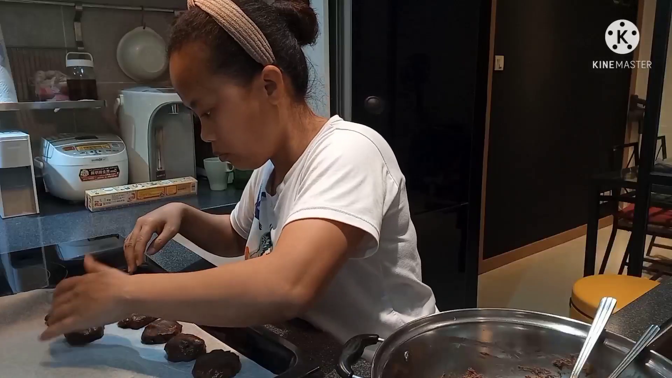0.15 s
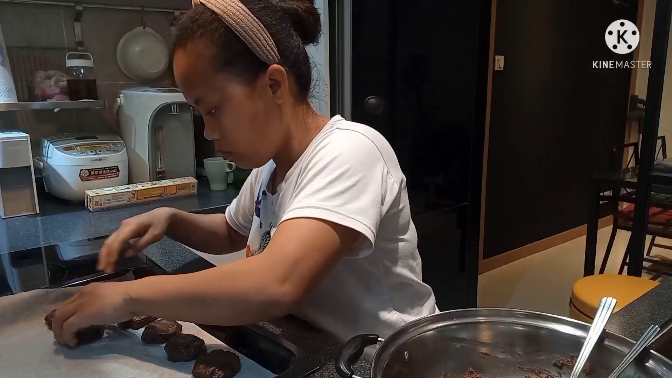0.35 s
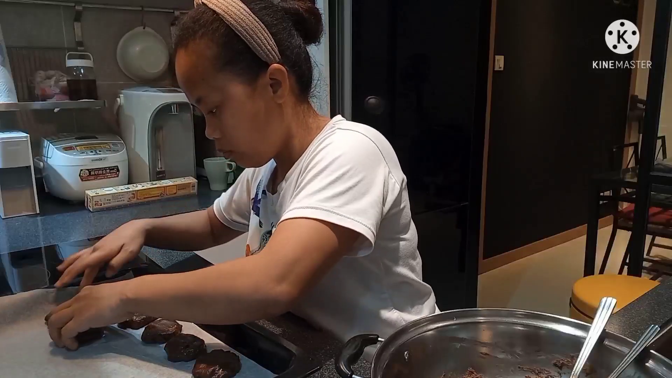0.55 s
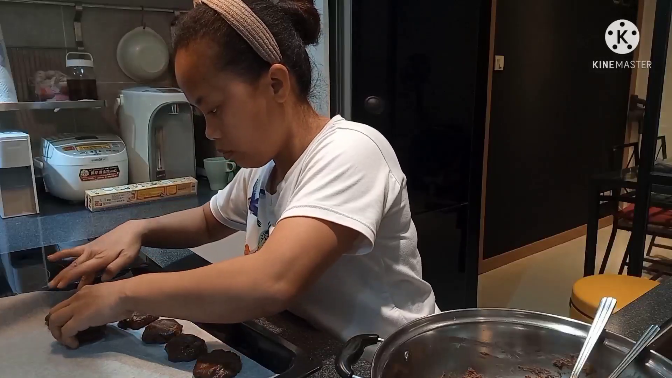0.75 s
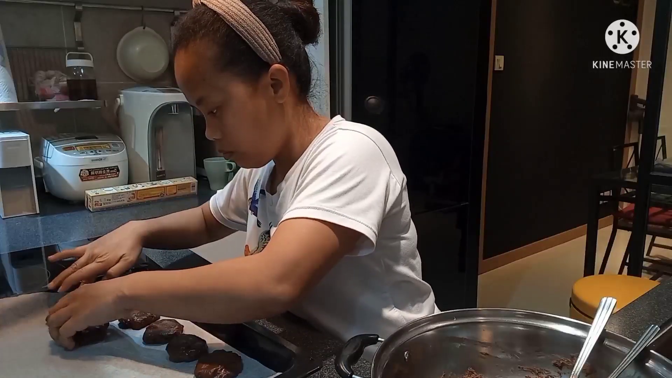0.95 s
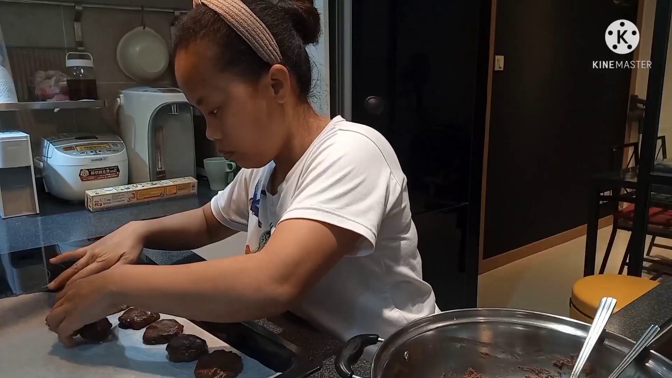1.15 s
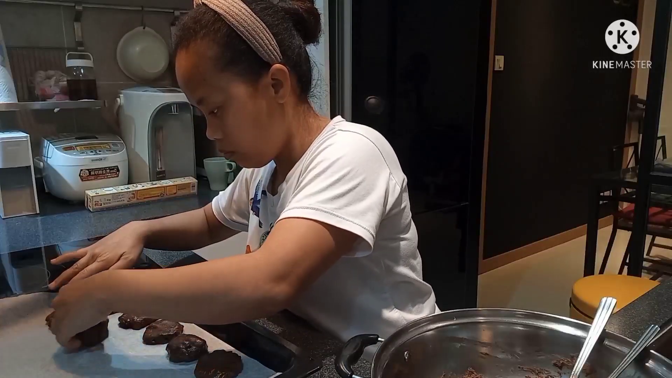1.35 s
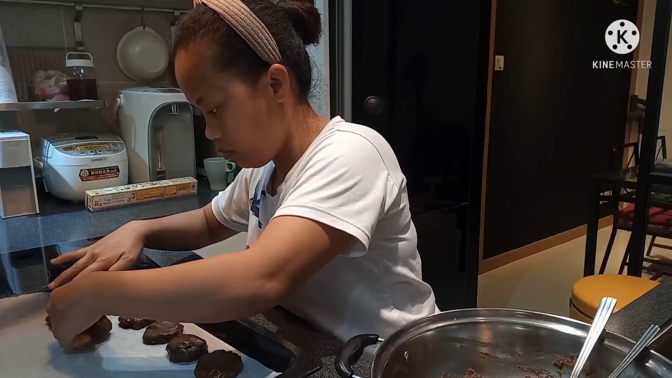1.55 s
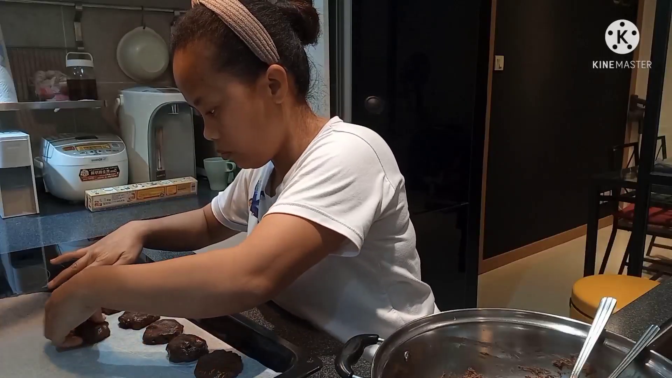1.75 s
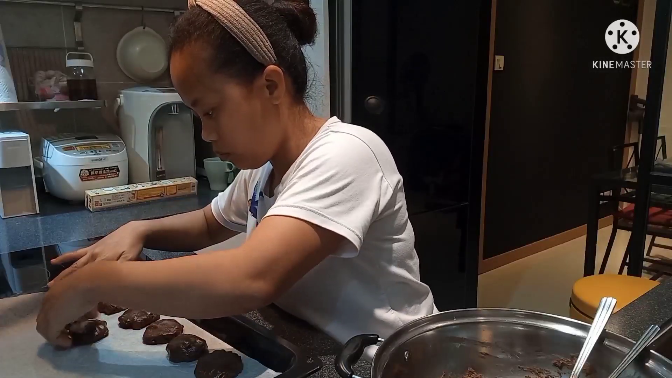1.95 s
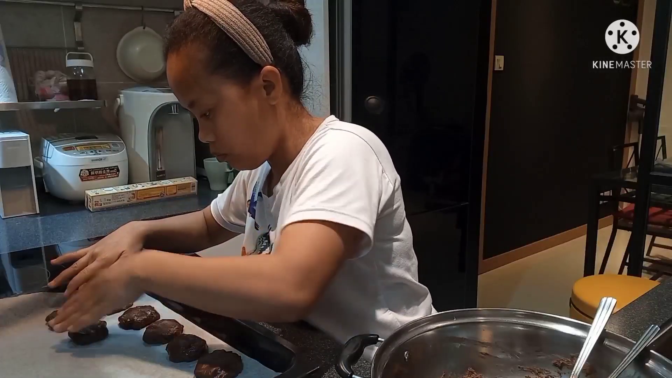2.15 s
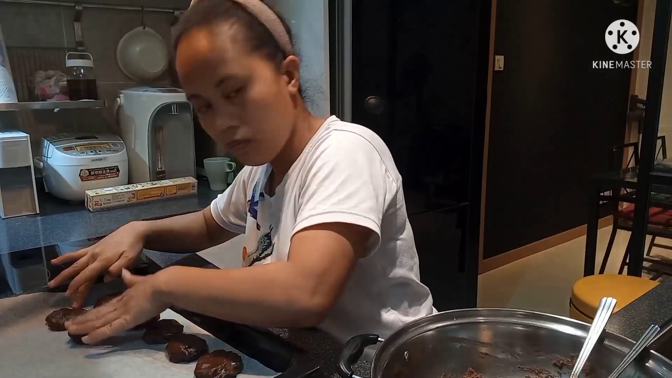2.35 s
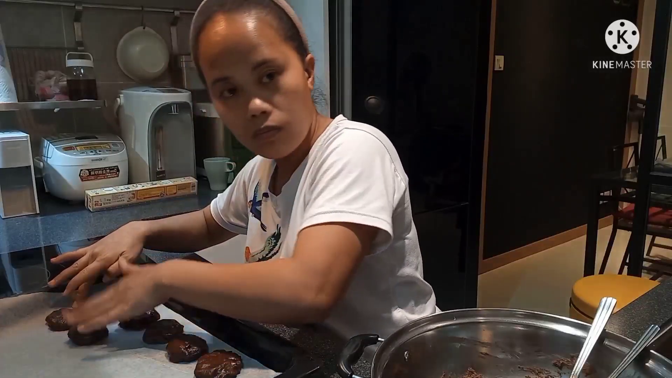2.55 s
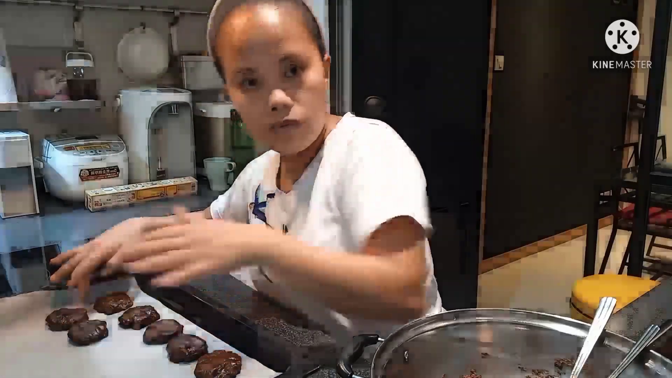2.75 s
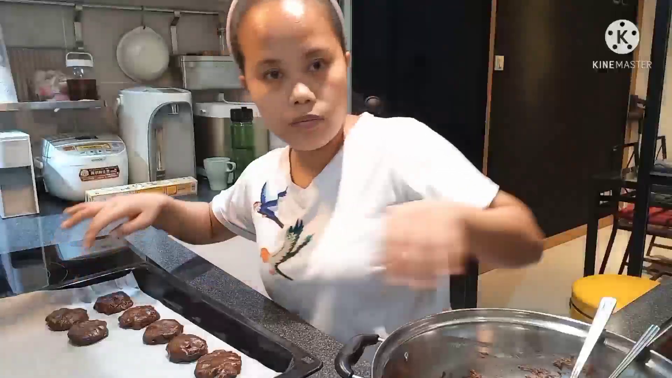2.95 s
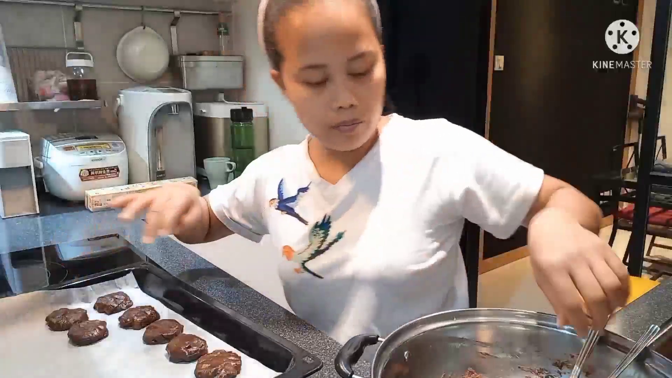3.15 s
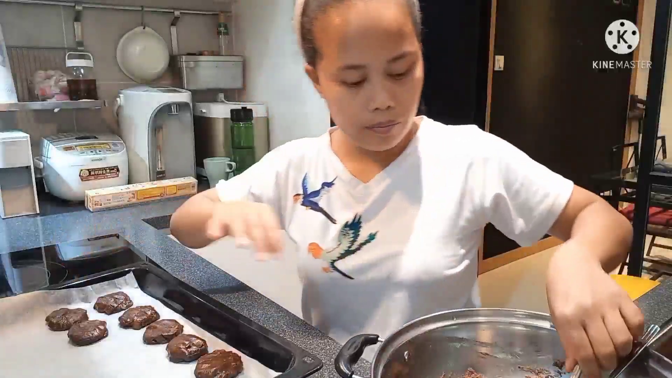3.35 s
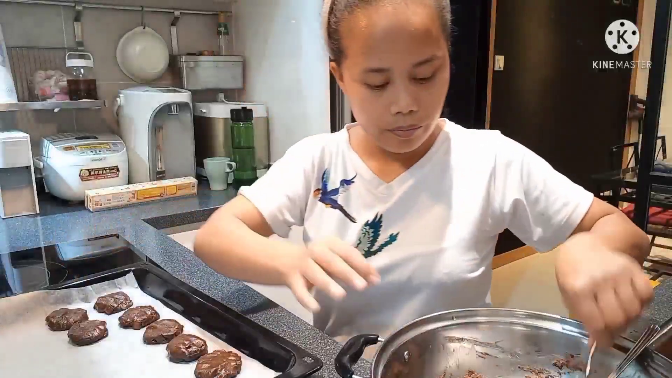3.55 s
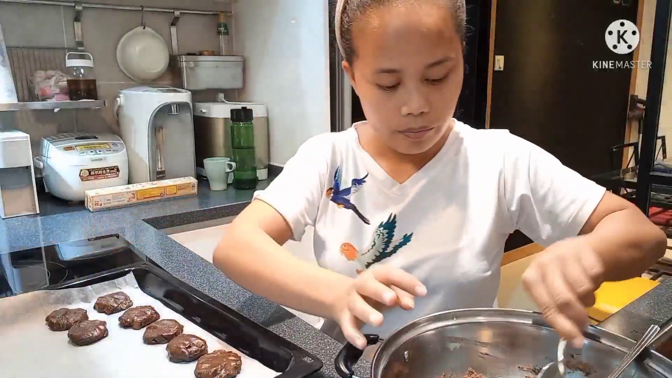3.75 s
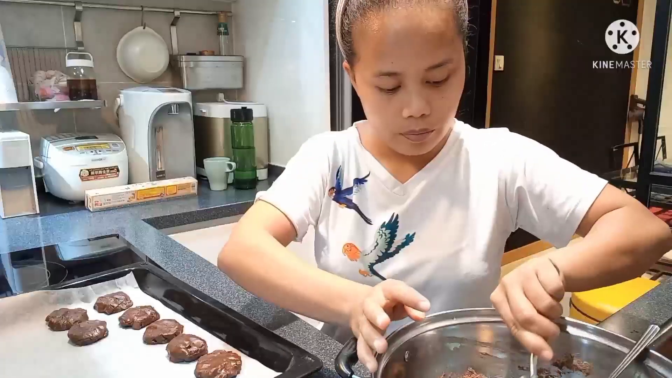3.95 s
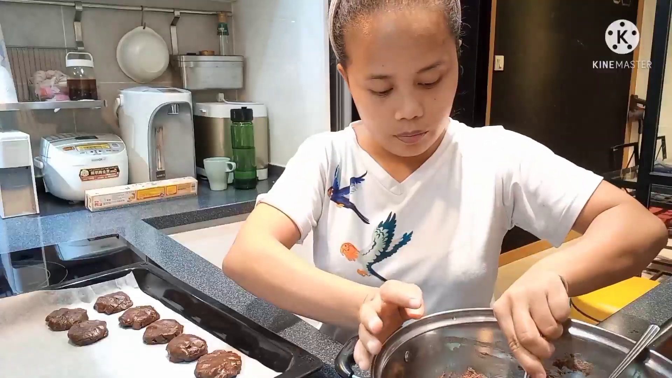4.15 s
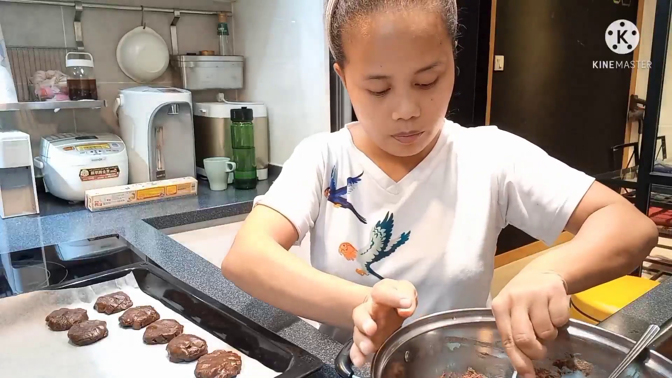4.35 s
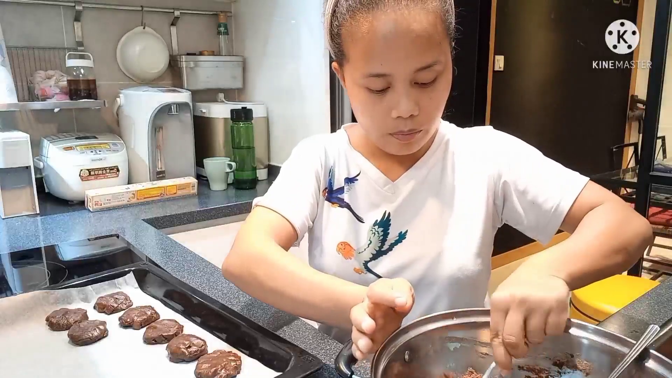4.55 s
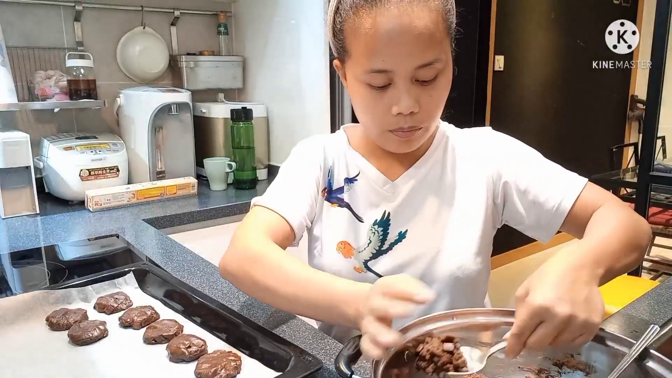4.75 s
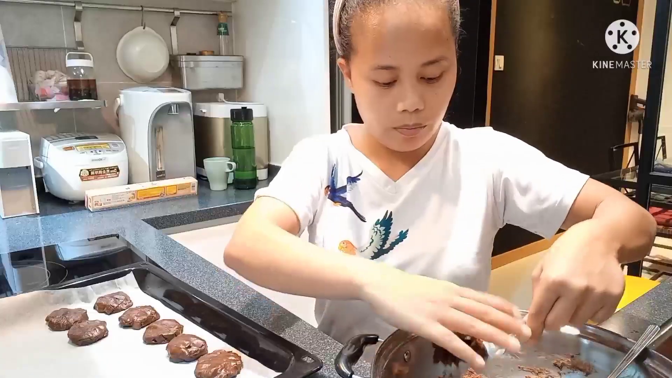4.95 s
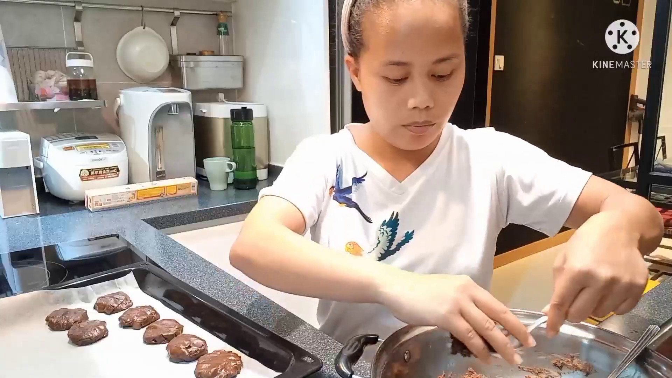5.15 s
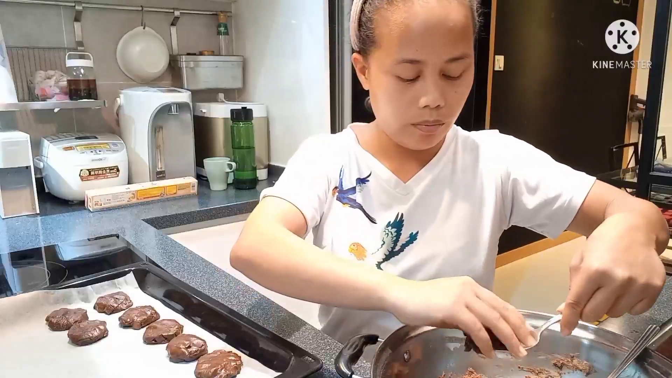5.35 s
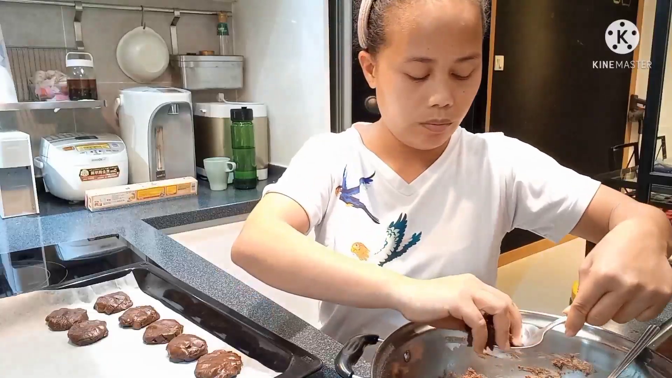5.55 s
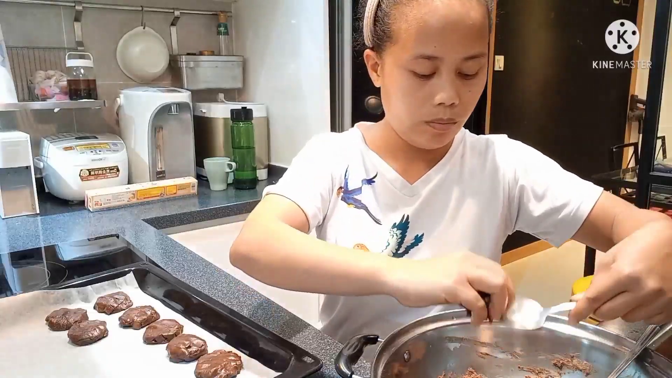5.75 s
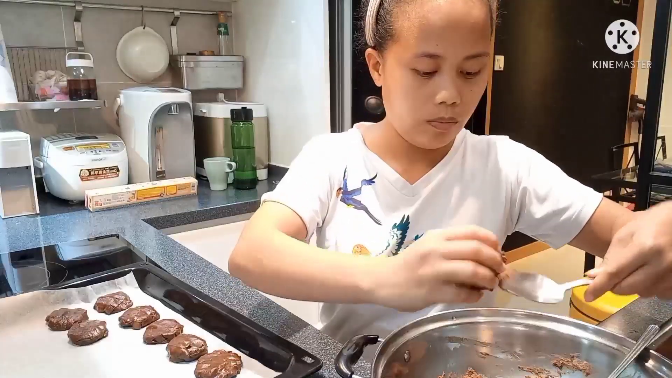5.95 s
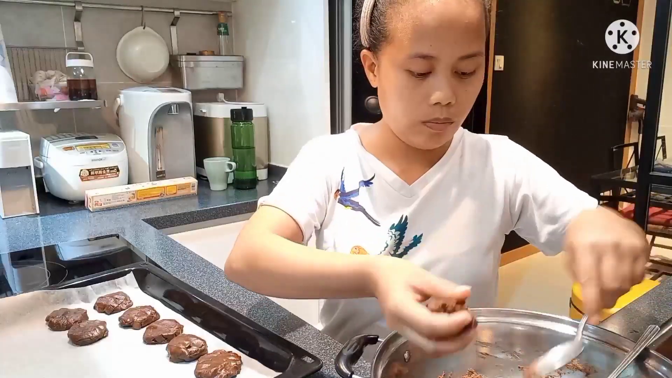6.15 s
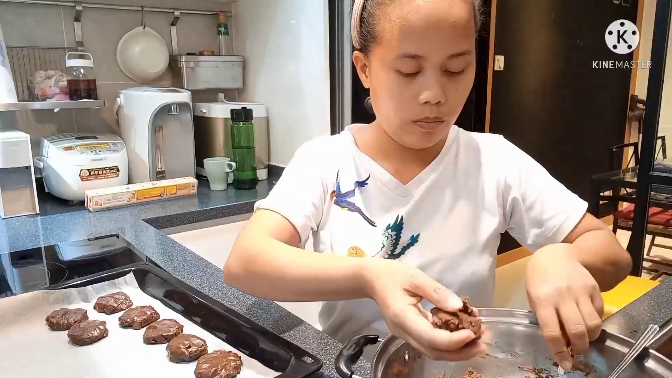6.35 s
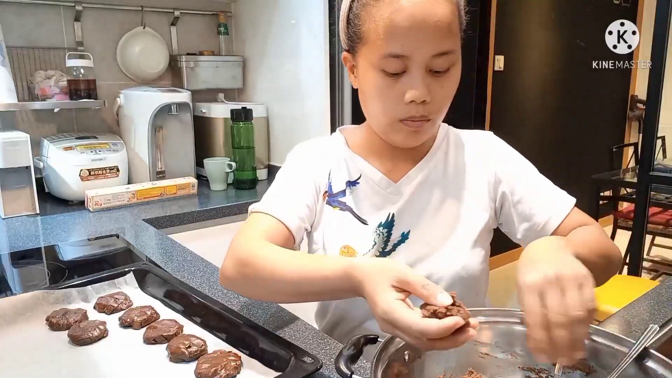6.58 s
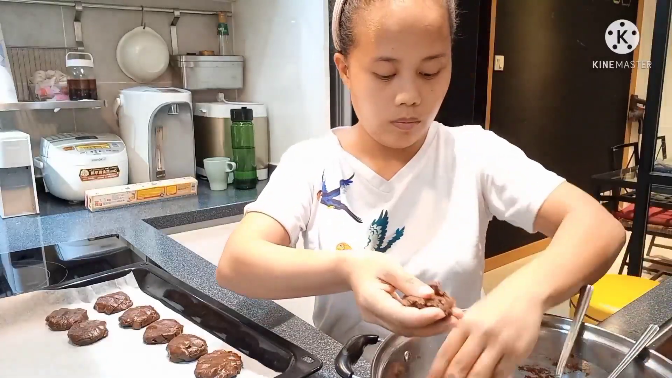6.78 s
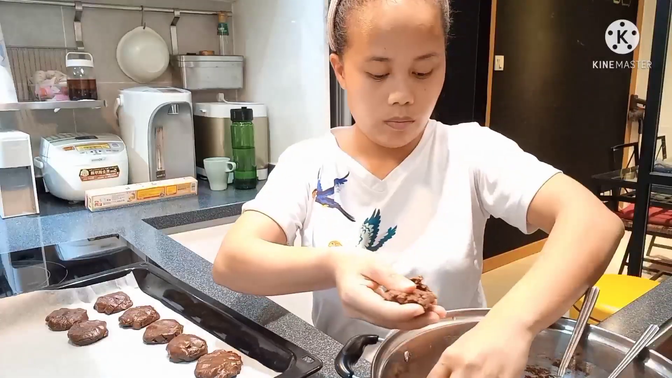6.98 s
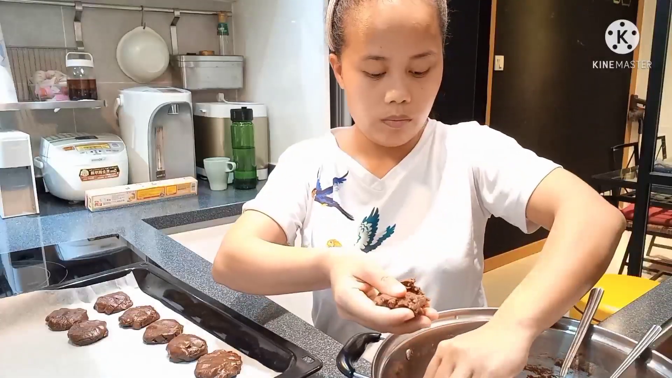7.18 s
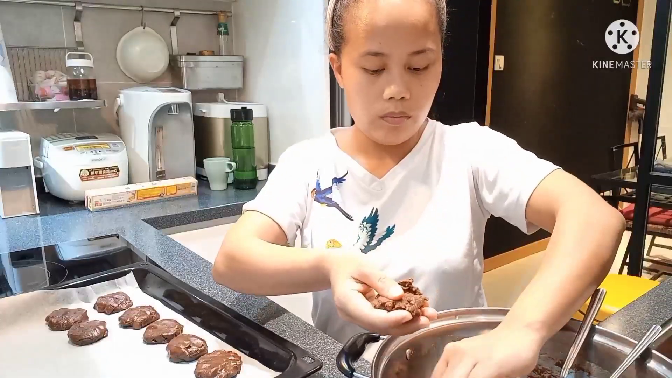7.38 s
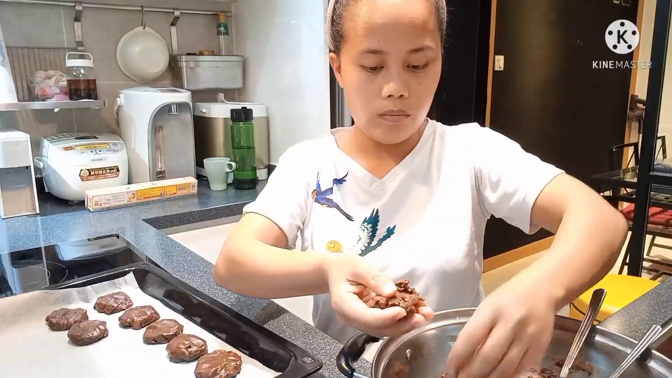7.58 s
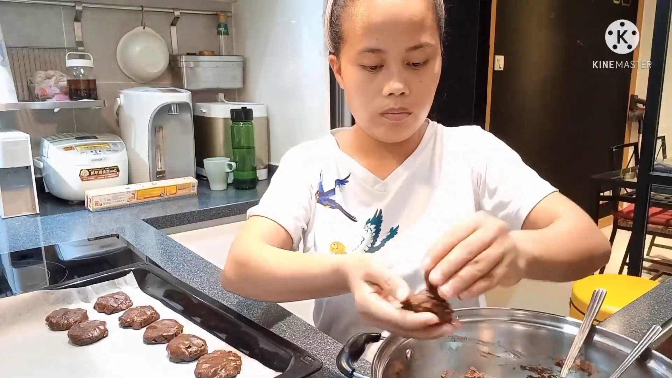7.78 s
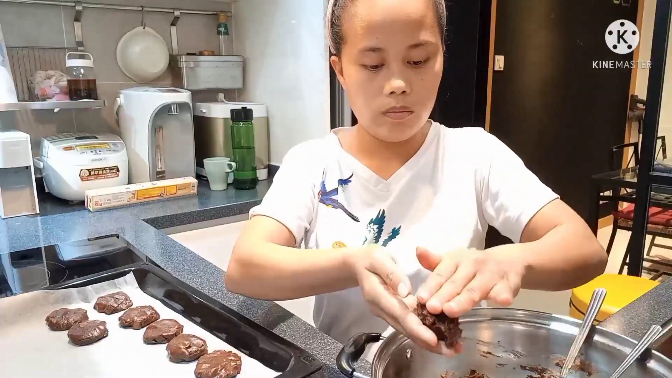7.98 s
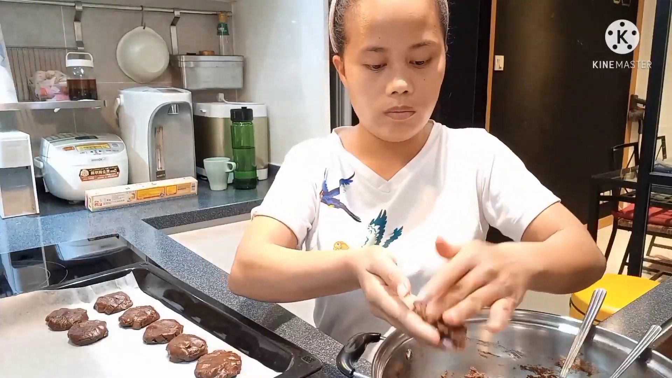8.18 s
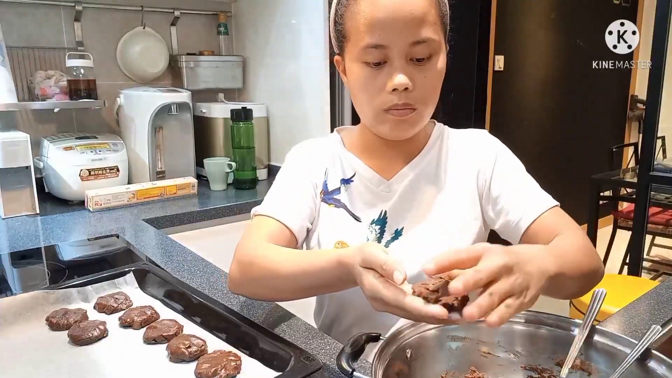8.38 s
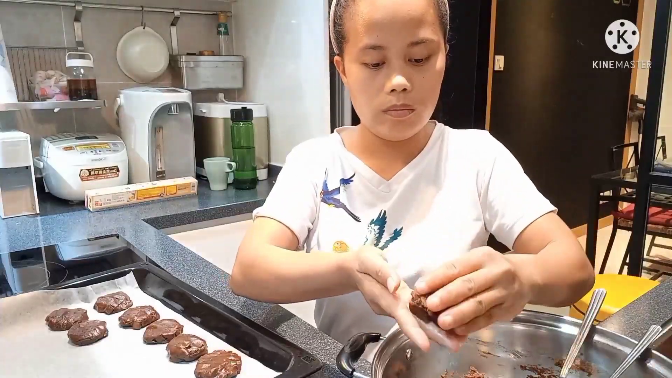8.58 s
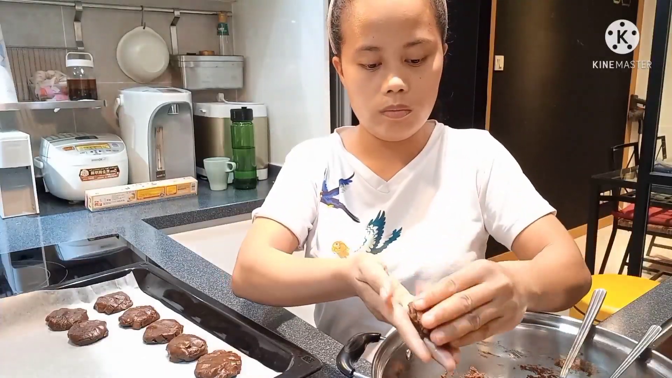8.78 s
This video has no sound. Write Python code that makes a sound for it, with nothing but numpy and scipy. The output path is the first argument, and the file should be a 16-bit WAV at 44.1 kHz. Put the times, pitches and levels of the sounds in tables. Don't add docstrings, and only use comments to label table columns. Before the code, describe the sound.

Baking paper crinkles and snaps under pressing fingers, a spoon scrapes a damped steel pot, taps twice, then drops with a bright clang in a quiet kitchen.

```python
import sys
import numpy as np
from scipy import signal
from scipy.fft import rfft, irfft, next_fast_len
from scipy.io import wavfile
from scipy.ndimage import map_coordinates

SR = 44100
rng = np.random.default_rng(int(sys.argv[2]) if len(sys.argv) > 2 else 0)


def magnitude_from_level(level_db):
    exponent = np.asarray(level_db, float) / 20
    return 10 ** exponent


def to_wav(sig):
    pcm = np.clip(np.atleast_2d(sig), -1, 1) * 32767
    pcm = np.round(pcm).astype(np.int16)
    wavfile.write(sys.argv[1], SR, pcm.T)


N = 388958

# (peak time [s], level [dB], rise [s], fall [s], weight on the tray [dB])
PRESSES = [(0.058, -65, 0.19, .13, -40), (0.654, -72, 0.0026, 0.32, -24), (0.700, -47, 0.009, 0.096, -28),
           (0.731, -46, 0.04, 0.1, -14), (0.82, -73.5, 0.31, 0.16, 8), (0.93, -69, 0.36, 0.1, -30),
           (0.986, -65.5, .004, 0.17, -32), (1.014, -63, .004, 0.19, -25), (1.095, -60, 0.034, 0.16, 4.5),
           (1.17, -58, 0.35, 0.11, -16), (1.362, -80, .004, 0.51, -9), (1.434, -56.5, 0.061, 0.11, -26),
           (1.51, -69, 0.35, 0.098, -10), (1.727, -78.5, .004, 0.52, -5), (1.875, -70.5, 0.22, 0.062, -14),
           (2.014, -70.5, 0.067, 0.12, -3)]
# (peak time [s], level [dB], rise [s], fall [s], weight on the tray [dB])
LIFTS = [
    (2.5, -70, 0.063, 0.12, -22),
    (2.66, -80.5, .08, 0.13, -2),
    (2.79, -72.5, 0.066, 0.14, -16),
]
# (offset [dB], share of the weight [0-1])
LIFT_HISS = (-7, .1)
# (frequency [Hz], level [dB per Hz])
CRINKLE_COLOUR = [(290, -45), (500, -2), (688, -16), (784, -16.5), (1110, -9.5), (1820, -7.5), (4730, -3),
                  (10400, -7.5), (14700, -6.5), (16000, -19.5)]
# (time [s], peak level [dB], frequency [Hz], broad share [0-1])
FOLD_SNAPS = [(0.6992, -46, 4640, .12), (0.7299, -24.5, 6000, .9), (0.8767, -46, 4530, 0.17),
              (0.9218, -49, 4920, .25), (0.9847, -51, 4430, .15), (1.0129, -35.5, 6560, 0.32),
              (1.073, -50, 4550, .05), (1.0892, -33, 4400, 0.066), (1.1437, -48, 4430, .2),
              (1.1698, -43, 6700, 0.37), (1.36, -72.5, 7000, .25), (1.3796, -67, 2830, .15),
              (1.4042, -50, 6600, .2), (1.437, -42, 3800, 0.27), (1.497, -47, 6890, 0.22),
              (1.753, -50.5, 6100, 0.13)]
# (time [s], peak level [dB], frequency [Hz], broad share [0-1])
RELEASE_SNAPS = [(2.4587, -67, 2820, 0.33), (2.496, -59, 2520, 0.18), (2.499, -61, 4520, .2),
                 (2.5, -63, 6600, .1), (2.6493, -70, 2830, .3), (2.6696, -68, 2870, .4),
                 (2.774, -66, 6580, .1), (2.789, -59, 4510, .15), (3.0698, -70, 6850, .1)]
# (time [s], level [dB], frequency [Hz])
PALM_THUDS = [
    (1.072, -66.5, 212),
]


def paper():
    tray_layer = (0, 1)
    pressing = strokes(PRESSES, tray_layer, (-1.6, 0.13))
    lifting = strokes(LIFTS, tray_layer, LIFT_HISS)
    crinkle, tray, hiss = pressing + lifting
    low, mid, top = bands(CRINKLE_COLOUR, (500, 2300, 8000, 17000), grit_db=3.0, rate=450)
    out = tray * low + crinkle * mid + hiss * top
    for s, db, hz, broad in FOLD_SNAPS:
        add(out, s, magnitude_from_level(db - 6.5) * click(hz, 0.047, width=270, broad=broad, tail=0.46))
    for s, db, hz, broad in RELEASE_SNAPS:
        add(out, s, magnitude_from_level(db - 8) * click(hz, 0.11, width=170, broad=broad, tail=0.77, top_hz=7000))
    for s, db, hz in PALM_THUDS:
        add(out, s, magnitude_from_level(db) * click(hz, 0.81, width=100, broad=0, tail=1.1))
    return out


# (peak time [s], level [dB], rise [s], fall [s])
SMEARS = [
    (5.8, -81, 0.16, 0.6),
    (5.95, -76, 0.36, 0.1),
    (8.22, -77, 0.42, .1),
    (8.238, -70, 0.0039, 0.15),
    (8.746, -79.5, 0.39, 0.33),
]
# (frequency [Hz], level [dB per Hz])
SMEAR_COLOUR = [(2060, -42), (3500, -7), (4810, -8.5), (5160, -15.5), (6740, 0), (9140, -10.5), (14800, -2),
                (16000, -5)]
# (time [s], peak level [dB], frequency [Hz])
DOUGH_TICKS = [(3.9856, -53, 6900), (5.2694, -68, 6370), (7.232, -46, 5500), (8.1396, -66, 7030),
               (8.1694, -65, 6490), (8.2373, -54.5, 8170), (8.6494, -68, 6900), (8.6844, -63.5, 6900),
               (8.7315, -60, 6700)]


def dough():
    out = strokes(SMEARS)[0] * bands(SMEAR_COLOUR, (3500, 17000), grit_db=2.5, rate=650)[0]
    for s, db, hz in DOUGH_TICKS:
        add(out, s, magnitude_from_level(db - 6.5) * click(hz, 0.095, width=550, broad=0.078, tail=0.4))
    return out


# (peak time [s], level [dB], rise [s], fall [s], weight on the bowl [dB])
SCRAPES = [(3.44, -72.5, 0.022, 0.42, 6), (3.474, -49, 0.01, 0.085, 1), (4.244, -69.5, 0.0035, 0.081, 13),
           (4.3, -78.5, 0.083, 0.61, 13.5), (4.45, -68.5, 0.51, 0.14, 6), (4.538, -52, 0.087, 0.057, -0.5),
           (4.552, -48, 0.0051, 0.064, 4), (4.641, -45.5, 0.038, 0.071, -1.5), (4.69, -61, 0.045, 0.26, 1),
           (4.86, -69, 0.34, 0.19, -31)]
# (peak time [s], level [dB], rise [s], fall [s], weight on the bowl [dB])
SETTLES = [
    (6.884, -62, .004, 0.14, -9),
    (6.92, -62, 0.083, 0.11, 10),
    (7.445, -76, 0.014, 0.17, 5),
]
# (peak time [s], level [dB], rise [s], fall [s], weight on the bowl [dB])
WIPES = [
    (4.12, -63, 0.25, 0.25, -26.5),
    (7.125, -84, 0.017, 0.17, -21),
    (7.17, -66.5, 0.091, 0.31, -18),
    (7.235, -61.5, 0.15, 0.11, -22),
]
# (frequency [Hz], level [dB per Hz])
RASP_COLOUR = [(180, -60), (300, -9.5), (447, 1), (584, -7), (713, -6), (814, -2.5), (1040, -3),
               (1170, -17.5), (1810, -22), (3350, -22), (5430, -18), (6740, -16.5), (8360, -22.5),
               (14700, -24.5), (16000, -32)]
# (time [s], peak level [dB], bowl level [dB], scratch [Hz], bowl [Hz])
NUDGES = [(3.4836, -37, -22, 4400, 547), (4.2436, -50, -5, 5000, 710), (4.374, -46, -13.5, 5420, 736),
          (4.5199, -40, -16.5, 4800, 700), (4.5515, -35, 1.5, 6900, 745), (4.5693, -48, 11.5, 6950, 513),
          (4.6308, -35, -37, 5630, 580), (4.6424, -27.5, -4.5, 5500, 880), (4.6694, -43.5, 4.5, 6400, 1050),
          (4.7157, -40.5, -8, 6920, 660), (4.7392, -43, -5, 4420, 716), (6.2561, -32, -5, 4780, 740),
          (6.3091, -21.5, -28, 5290, 714), (6.9039, -51, -12, 6410, 1000), (6.9294, -41.5, -5, 6400, 563),
          (6.945, -52.5, 3.5, 4550, 990), (7.443, -60, -11, 6450, 555), (7.478, -60.5, 4, 6400, 616)]
# (time [s], modes as (frequency [Hz], level [dB], t60 [s]))
FREE_RINGS = [
    (3.47, [(535, -62, 0.1), (1034, -64, 0.13), (1190, -58.5, 0.2), (1923, -55.5, 0.22), (2660, -58, 0.13), (4430, -61, 0.32)]),
    (6.884, [(1039, -55, 0.23), (2060, -61, .15), (2630, -59, 0.39), (3520, -64, .15), (6400, -53, .15)]),
    (6.925, [(600, -58, .15), (1033, -55, .2), (2175, -61, .5), (6450, -57, .1)]),
    (7.447, [(591, -66, .22), (1038, -63, 0.16), (2400, -71.5, .15), (5700, -77, .15), (6480, -65, 0.16)]),
]


def scraping():
    bowl_layer = (0, 0.73)
    scraped = strokes(SCRAPES, bowl_layer, (-6, 0.87), (-1.1, .1))
    settled = strokes(SETTLES, bowl_layer, (0, 0.61), (-4.5, 0.63))
    wiped = strokes(WIPES, bowl_layer, (-8, 0.49), (-1.9, 0.09))
    rasp, bowl, wall, hiss = scraped + settled + wiped
    low, side, mid, top = bands(RASP_COLOUR, (300, 1500, 4000, 8000, 17000), grit_db=2.5, rate=210,
                                body=steel(45, .6))
    out = magnitude_from_level(-2.5) * (bowl * low + wall * side + rasp * mid + hiss * top)
    for s, db, bowl_db, hz, bowl_hz in NUDGES:
        add(out, s, magnitude_from_level(db - 13.0) * click(hz, 0.053, width=320, broad=0.12, tail=0.87))
        near = [(f, -14 * abs(np.log2(f / bowl_hz)), .07) for f, _, _ in POT_LOW[2:13]]
        add(out, s, magnitude_from_level(db + bowl_db - 6) * ring(near, 0.11, split=0.015))
    for s, modes in FREE_RINGS:
        add(out, s, ring(modes, 0.44, attack=0.0036, split=0.007))
    return out


# (peak time [s], level [dB], rise [s], fall [s], weight on the bowl [dB])
RIM_SLIDES = [
    (6.2555, -48, 0.00091, 0.16, 0),
    (6.3095, -40, 0.001, 0.067, -16),
    (6.37, -51, .06, 0.12, -11.5),
    (6.528, -68.5, 0.13, 0.033, -8.5),
]
# (frequency [Hz], level [dB per Hz])
JINGLE_COLOUR = [(180, -62.5), (300, -30.5), (440, -9.5), (494, -19), (701, -9.5), (885, -22.5),
                 (1080, -16), (1780, -24.5), (5340, -4.5), (6410, -16.5), (14700, -29.5), (16000, -46.5)]
# (time [s], peak level [dB])
RIM_TAPS = [(6.2567, -31), (6.3092, -20.5), (6.3188, -29), (6.3252, -27.5), (6.334, -31), (6.3398, -33),
            (6.3508, -36), (6.369, -35.5), (6.376, -36), (6.3893, -36.5)]
# (frequency [Hz], level [dB], t60 [s])
SPOON_MODES = [(3310, -12, .08), (4130, -10, .12), (4732, 0, 0.17), (4940, 0, 0.25), (5240, -0.5, .12),
               (5370, 0, .12), (5380, -6, .16), (6400, -9, 0.076), (6540, -12.5, .05), (8770, -21, .06),
               (11300, -23.5, .1)]
# (time [s], level [dB], frequency [Hz])
EDGE_CRACKS = [
    (4.6427, -35.5, 5970),
    (6.2578, -38.5, 4900),
    (6.3096, -23.5, 5300),
    (6.3117, -29, 5006),
]
# (time [s], level [dB])
RIM_KNOCKS = [
    (6.2552, -46),
    (6.3092, -50),
    (6.37, -55),
]
# (frequency [Hz], level [dB], t60 [s])
RIM_MODES = [(444, -8, .2), (689, -3.5, .2), (790, -8, .12), (1054, -10.5, 0.15), (1560, -1, .12),
             (2040, -3, 0.07), (2288, -3, 0.086), (2590, -7, .08), (3365, -17, .1)]


def spoon():
    jingle, bowl, wall, hiss = strokes(RIM_SLIDES, (0, 1), (-1.9, 0.6), (-11.5, -0.19))
    low, side, mid, top = bands(JINGLE_COLOUR, (300, 1300, 3500, 7000, 17000), grit_db=3.5, rate=230)
    out = magnitude_from_level(-1.5) * (bowl * low + wall * side + jingle * mid + hiss * top)
    for s, db in RIM_TAPS:
        add(out, s, magnitude_from_level(db - 17.5) * ring(SPOON_MODES, .2, damping=0.79, attack=.0003, split=0.011))
        add(out, s, magnitude_from_level(db - 10.0) * click(4500, .05, width=590, broad=0.036, tail=0.23))
    for s, db, hz in EDGE_CRACKS:
        add(out, s, magnitude_from_level(db) * click(hz, .03, width=1100, broad=.12, tail=.1))
    for s, db in RIM_KNOCKS:
        add(out, s, magnitude_from_level(db) * ring(RIM_MODES, .2, attack=.0004, split=0.02))
    return out


# (time [s], level [dB])
DROPS = [
    (6.537, -19.5),
    (6.553, -30),
    (6.572, -32.5),
]
# (frequency [Hz], level [dB], t60 [s])
POT_LOW = [(113.5, -7, .55), (255, -16, .27), (446, -6, .25), (530, -3, .13), (616, -20, .25),
           (683, -3.5, .21), (724, -11, .2), (1062, -10, .22), (1122, -17, .11), (1195, -8.5, .3),
           (1222, -7, .3), (1524, -10, .17), (1857, -21, .23), (2024, -20, .13), (2175, -17, .27),
           (2385, -22, .22), (2600, -15, .3), (2884, -10, .33), (3090, -19, .15), (3455, -10.5, .38)]
POT_HIGH = [(4150, -13, .33), (4570, -12, .27), (4750, -13, .22), (5443, -5, .22), (5631, -11, .15),
            (6300, -14, .15), (6901, -2.5, .22), (6972, -2.5, .24), (6700, -12, .12), (7300, -12, .15),
            (7752, -11, .22), (8400, -13, .15), (9450, -8, .18), (10175, -6, .13), (11060, -5, .14)]
POT_TOP = [(11350, 5.5, 0.15), (12000, -2, .22), (12400, -0.5, .2), (13840, -2, .22), (14730, -1, .2)]
# (frequency [Hz], level [dB per Hz])
WASH_COLOUR = [(88, -38), (150, -3.5), (341, -14.5), (689, -6.5), (1210, -10.5), (1360, -14.5), (3490, -18),
               (3770, -17), (4670, -13), (5150, -18.5), (7040, -14), (15100, -25.5), (16000, -45.5)]
# (frequency [Hz], t60 [s])
WASH_FADE = [(250, 0.66), (530, 0.15), (1390, 0.32), (3680, .27), (9700, 0.24)]
# (frequency [Hz], width [Hz], depth [0-1])
MODE_GAPS = [(3860, 210, .9), (5200, 270, .85), (5800, 150, .7), (8700, 390, .8), (10500, 350, .85),
             (13200, 500, .9), (14350, 400, .85), (15700, 500, .7)]


def clang():
    out = np.zeros((2, N))
    length = .36
    wall = steel(30, .13)
    for s, db in DROPS:
        wash = filtered(dying(WASH_FADE, .6), lambda f: magnitude_from_level(along(WASH_COLOUR, f)) * wall(f))
        add(out, s, magnitude_from_level(db - 13.0) * unit(wash))
        modes = ring(POT_LOW, length, attack=0.0006, split=0.0039)
        modes += magnitude_from_level(-1.5) * ring(POT_HIGH, length, attack=.0003, split=0.006)
        modes += magnitude_from_level(-12.0) * ring(POT_TOP, length, attack=.0003, split=.008)
        add(out, s, magnitude_from_level(db - 3.0) * modes)
        add(out, s, magnitude_from_level(db - 1.0) * click(11000, .05, width=2600, broad=.1, tail=0.16))

    def gaps(f):
        notches = [1 - depth * 1j * f * w / (hz * hz - f * f + 1j * f * w) for hz, w, depth in MODE_GAPS]
        return np.prod(notches, axis=0)

    return signal.sosfilt(signal.butter(2, 75, 'high', fs=SR, output='sos'), filtered(out, gaps))


def steel(sharpness, between):
    f = np.geomspace(50, SR / 2, 3000)
    modes = POT_LOW[2:] + POT_HIGH + POT_TOP
    bumps = sum(1 / (1 + (sharpness * (f / hz - 1)) ** 2) ** 2 for hz, _, _ in modes)
    dense = 0.077 / (1 + (8000 / f) ** 16)
    gain = np.sqrt(between ** 2 + np.minimum(bumps, 1) + dense)
    return lambda hz: np.interp(hz, f, gain)


# (time [s], level [dB], frequency [Hz], t60 [s])
BUMPS = [
    (1.059, -48, 104.5, 0.39),
    (2.563, -48.5, 85, 0.28),
    (2.632, -46, 89, .15),
]


def counter():
    out = np.zeros((2, N))
    for s, db, hz, t60 in BUMPS:
        add(out, s, ring([(hz, db, t60)], .3, attack=0.012, split=0.082))
    return out


# (peak time [s], level [dB], rise [s], fall [s])
COUNTER_LEANS = [
    (1.1, -51.5, 0.12, 0.11),
    (2.66, -59.5, 0.13, 0.3),
    (6.6, -46, 0.09, 0.22),
]
# (frequency [Hz], level [dB per Hz])
BOOM_COLOUR = [(20, -40), (45, -32), (65, -16), (88, -8), (98, -8), (108, 0), (120, -15), (140, -40),
               (170, -120)]
# (frequency [Hz], level [dB rms])
FRIDGE_LINES = [(215.5, -79), (323.5, -89), (441.5, -74), (537.5, -83.5), (624, -86)]
# (frequency [Hz], level [dB per Hz])
AIR_COLOUR = [(76, -34), (130, -4), (138, -7), (176, -8), (243, -15.5), (328, -16), (394, -18.5), (444, -5),
              (472, -16.5), (846, -22.5), (1010, -25.5), (1490, -24), (4320, -35.5), (14800, -38.5),
              (16000, -48)]


def background():
    t = np.arange(N) / SR
    boom_gain = magnitude_from_level(-63.5 + 2.5 * wobble(4)) + strokes(COUNTER_LEANS)[0]
    boom = boom_gain * bands(BOOM_COLOUR, (15, 200), grit_db=-0.2, rate=15)[0]
    hum = np.zeros((2, N))
    for hz, db in FRIDGE_LINES:
        drift = 1.5 * np.array([wobble(1.6), wobble(1.8)])
        hum += magnitude_from_level(db - 0.5 + 1.7 * wobble(6)) * np.sin(2 * np.pi * hz * t + drift)
    air = magnitude_from_level(-74 + 0.65 * wobble(4.6)) * bands(AIR_COLOUR, (110, 19000), grit_db=0.5, rate=11)[0]
    return boom + hum + air


# (frequency [Hz], t60 [s])
KITCHEN_FADE = [(200, .35), (2000, 0.1), (12000, 0.065)]


def kitchen(x):
    tail = dying(KITCHEN_FADE, .4)
    delayed = np.pad(x, ((0, 0), (200, 0)))
    return signal.fftconvolve(delayed, tail / np.linalg.norm(tail[0]), axes=1)[:, :N]


# (frequency [Hz], correlation [-1 to 1])
PORT_LIKENESS = [(30, .3), (60, 0.95), (130, 0.94), (290, 0.68), (640, 0.42), (1410, -0.067),
                 (3100, -0.034), (6820, -0.062), (15000, 0.19)]
# (frequency [Hz], level [dB])
PORT_BALANCE = [(60, -1.5), (120, -2.5), (240, 3), (480, -9.5), (950, -5), (1890, -0.5), (3770, -0.5),
                (7520, -1.5), (15000, -3.5)]


def ports(paths):
    def mix(hz):
        turn = np.arccos(np.clip(along(PORT_LIKENESS, hz), -1, 1)) / 2
        balance = along(PORT_BALANCE, hz) / 2
        return np.array([[np.cos(turn), side * np.sin(turn)] * magnitude_from_level(side * balance) for side in (1, -1)])

    return filtered(paths, mix).sum(1)


def strokes(rows, *layers):
    out = np.zeros((len(layers) + 1, N))
    offset_db, share = np.transpose([(0, 0), *layers])[..., None]
    for s, db, rise, fall, *weight_db in rows:
        rise, fall = max(rise, .001), max(fall, .001)
        start = max(s - 2 * rise, 0)
        t = np.arange(round(start * SR), round((s + 2 * fall) * SR)) / SR - s
        swing = magnitude_from_level(-30 * np.maximum(-t / rise, t / fall))
        add(out, start, magnitude_from_level(db + offset_db + share * sum(weight_db)) * swing)
    return out


def bands(spectrum, edges, grit_db, rate, body=lambda f: 1):
    clumps_db = grit_db * wobble(rate) + 0.48 * grit_db * wobble(rate / 7)
    grains = magnitude_from_level(clumps_db) * rng.standard_normal((2, N))
    lo, hi = np.array([edges[:-1], edges[1:]])[..., None, None]

    def cut(f):
        return body(f) * magnitude_from_level(along(spectrum, f)) / (1 + (lo / (f + 1)) ** 10) / (1 + (f / hi) ** 10)

    return [unit(band) for band in filtered(grains, cut)]


def ring(modes, length, damping=1, attack=0.0026, split=0.0035):
    hz, db, t60 = np.transpose(modes)[:, None, :, None]
    t = np.arange(int(length * SR)) / SR
    hz = hz * (1 + split * rng.standard_normal((3, len(modes), 1)) * [[[0]], [[1]], [[1]]])
    spread = [[[[.2]], [[1]], [[1]]], [[[1]], [[1]], [[1]]]]
    phase = rng.random((2, 3, len(modes), 1)) * spread
    weaker_db = np.array([[[-1.5]], [[9]], [[9]]])
    level = magnitude_from_level(db - weaker_db - 60 * t / (t60 * damping))
    tones = level * np.sin(2 * np.pi * (hz * t + phase))
    return tones.sum((1, 2)) * (1 - np.exp(-t / attack)) * (1 - t / t[-1])


def click(hz, t60, width, broad, tail, top_hz=13000):
    t = np.arange(SR // 5) / SR

    def colour(f):
        no_bass = f * f / (f * f + hz * hz / 4)
        return no_bass * (broad / (1 + (f / top_hz) ** 4) + 1 / (1 + ((f - hz) / width) ** 2))

    puff = unit(filtered(rng.standard_normal((2, len(t))), colour))
    return puff * (magnitude_from_level(-60 * t / .014) + tail * magnitude_from_level(-60 * t / t60)) * (1 - t / t[-1])


def dying(fade, length):
    hz, t, z = signal.stft(rng.standard_normal((2, int(length * SR))), SR, nperseg=256)
    t60 = np.maximum(along(fade, hz), .02)[:, None]
    return signal.istft(z * magnitude_from_level(-60 * t / t60), SR, nperseg=256)[1]


def wobble(rate):
    coarse = np.arange(0, N + 16, 16)
    knots = rng.standard_normal(int(N * rate / SR) + 4)
    return np.interp(np.arange(N), coarse, map_coordinates(knots, [coarse * rate / SR]))


def filtered(x, response):
    m = next_fast_len(x.shape[-1] + 8192)
    return irfft(rfft(x, m) * response(np.fft.rfftfreq(m, 1 / SR)), m)[..., :x.shape[-1]]


def along(points, hz):
    f, v = np.transpose(points)
    return np.interp(np.log(hz + 1), np.log(f + 1), v)


def unit(x):
    return x / np.sqrt(np.mean(x ** 2) + 1e-20)


def add(track, s, sound):
    part = track[:, round(s * SR):][:, :sound.shape[1]]
    part += sound[:, :part.shape[1]]


def scene():
    hands = paper() + dough() + scraping() + spoon()
    drop = clang()
    room = kitchen(magnitude_from_level(-6.5) * hands + magnitude_from_level(-13.5) * drop)
    return ports(hands + drop + room + counter() + background())


def low_pass(x):
    return signal.sosfilt(signal.butter(12, 16520, fs=SR, output="sos"), x)


def record(dry):
    mix = filtered(dry, lambda hz: 1 / (1 + (hz / 15450) ** 60))
    return low_pass(mix)


dry = scene()
out = record(dry)
to_wav(out)
```